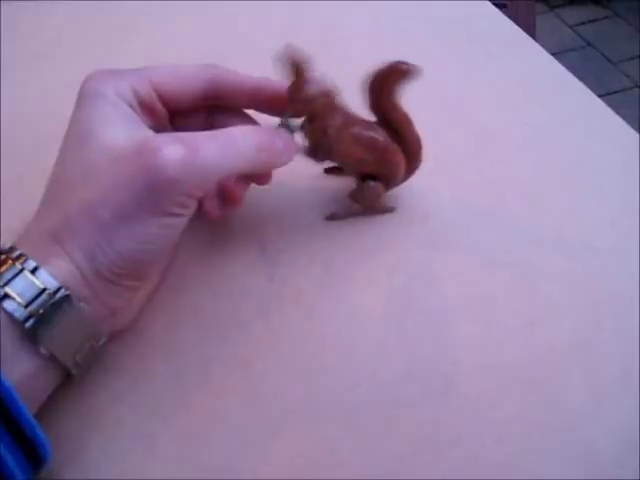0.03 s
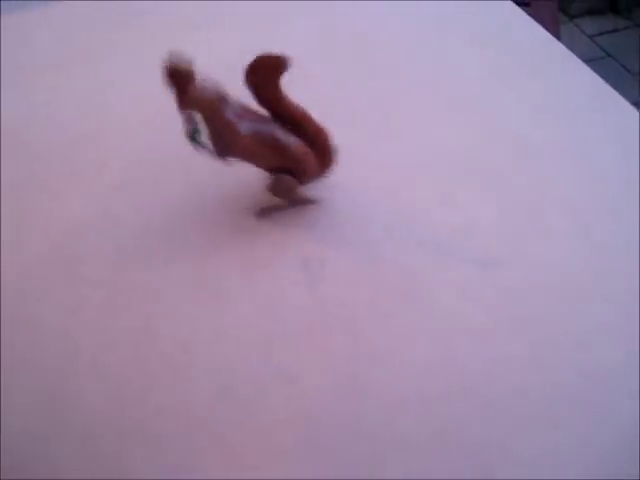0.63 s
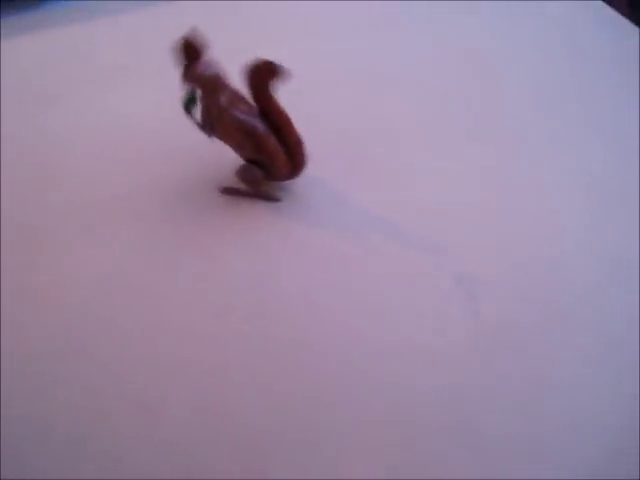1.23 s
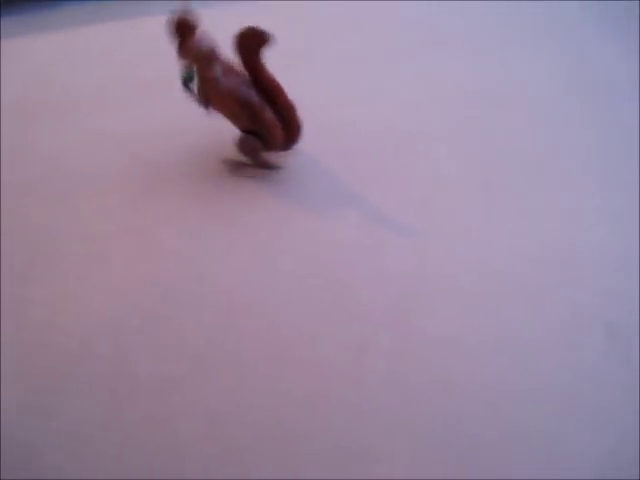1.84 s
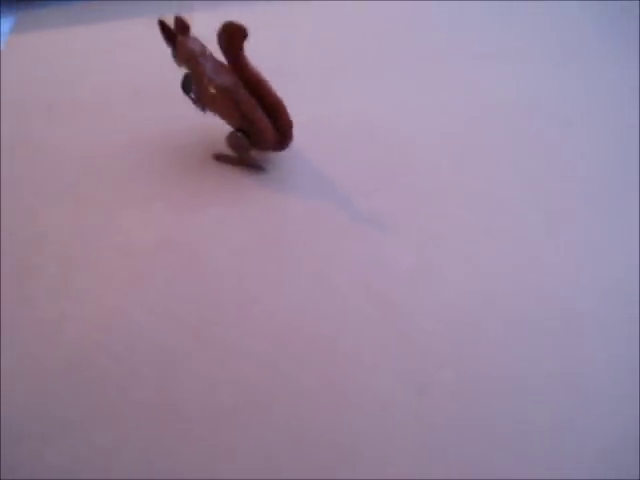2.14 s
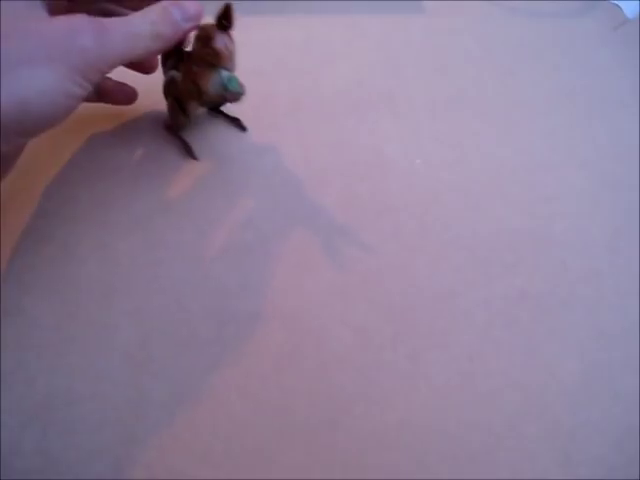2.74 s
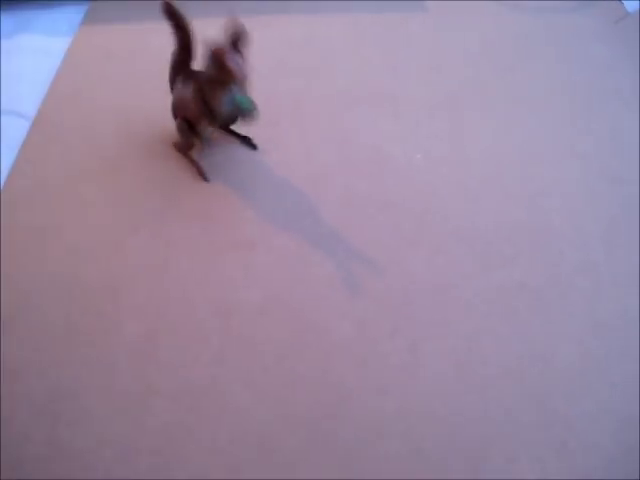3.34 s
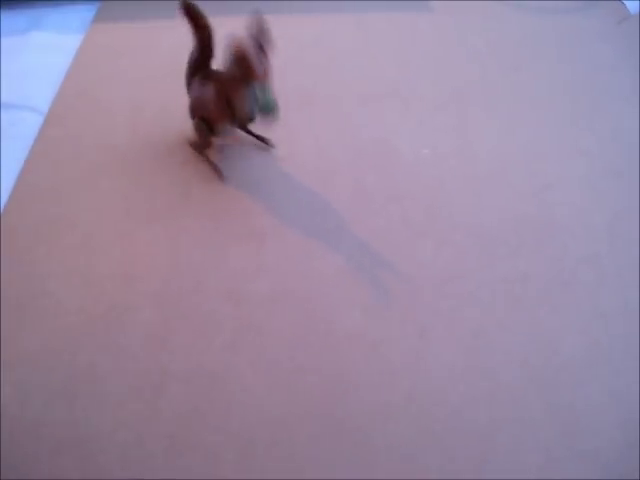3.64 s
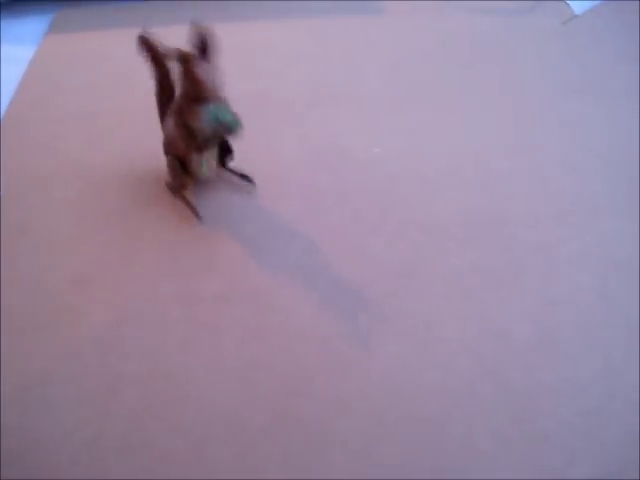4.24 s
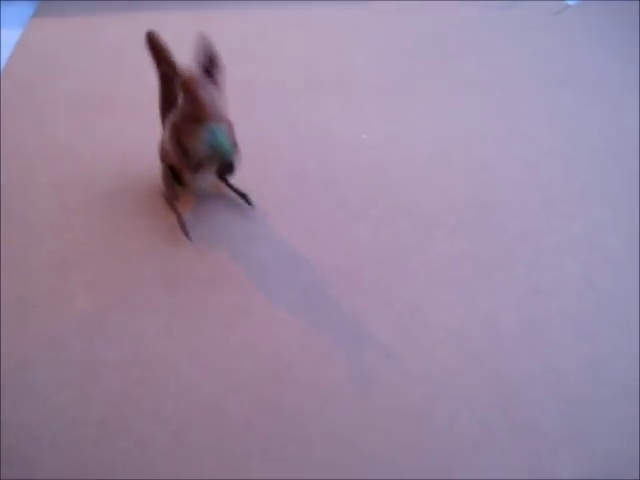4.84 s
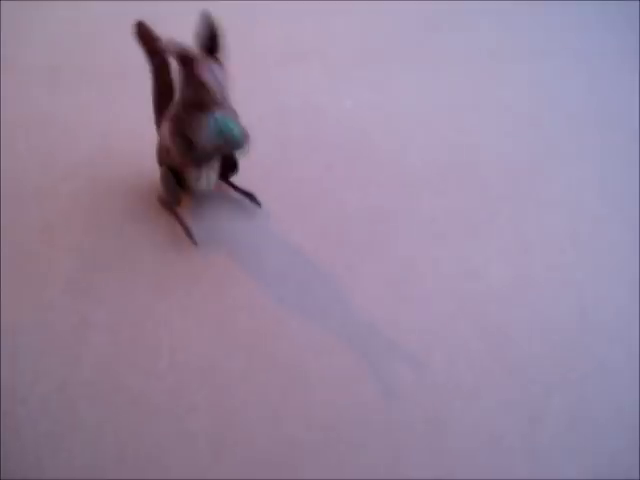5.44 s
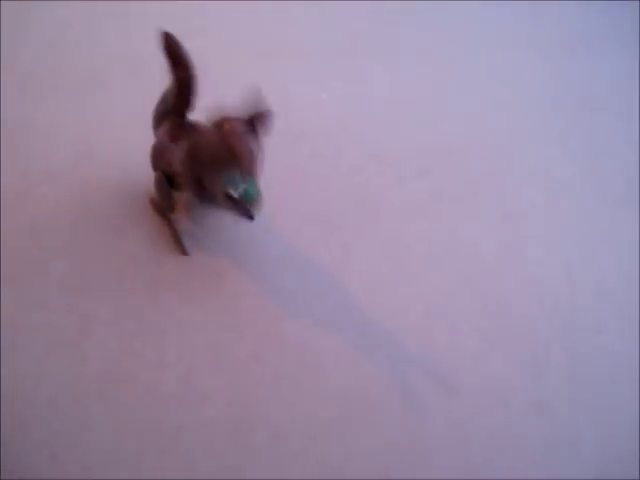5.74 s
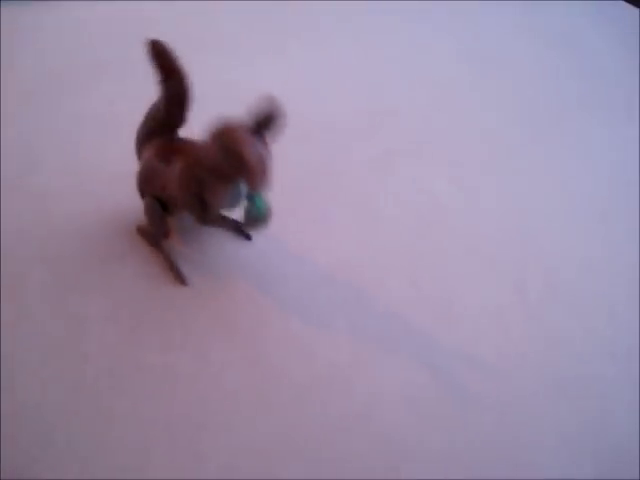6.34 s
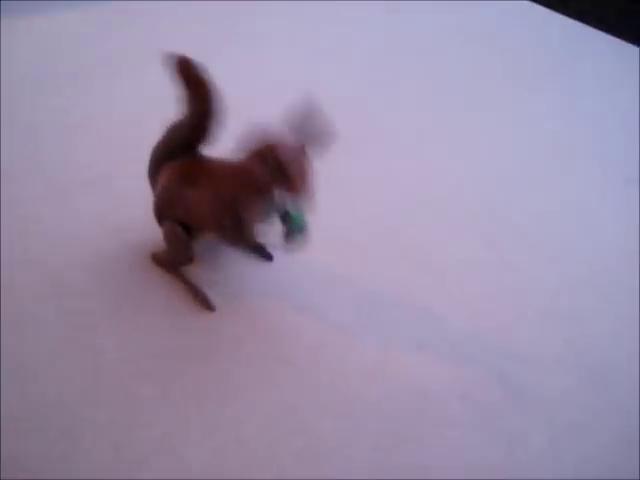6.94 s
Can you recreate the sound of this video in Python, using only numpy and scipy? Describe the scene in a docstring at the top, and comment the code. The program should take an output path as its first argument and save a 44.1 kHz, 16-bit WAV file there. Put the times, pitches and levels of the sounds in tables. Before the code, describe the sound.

A wind-up tin squirrel hops across a board close by, clacking and rattling five or six times a second over a faint gear whirr.

```python
"""Tin feet clack on a board: a clockwork squirrel hops close by, five to six times a second.
Each hop is one turn of a cam: the feet land, the toy rocks and rattles, the sprung legs kick out and
snap back. Every impact excites the modes of the tin; gears whirr and the board drums as the toy rocks.
It is heard first side-on, then, after a brief gap, head-on over a low hum, where the body also recoils
against its stop after the snap-back."""
import sys
import numpy as np
from scipy import signal
from scipy.fft import rfft, irfft
from scipy.io import wavfile
from scipy.ndimage import uniform_filter1d, map_coordinates

SR = 44100
rng = np.random.default_rng(int(sys.argv[2]) if len(sys.argv) > 2 else 0)


def persist_wave(psi):
    """Save psi, clipped to +-1, as 16-bit WAV."""
    counts = np.round(np.clip(psi, -1, 1) * 32767).astype(np.int16)
    wavfile.write(sys.argv[1], SR, np.atleast_2d(counts).T)


N = 308700

# turns of the cam: landing t/s, wait to kick t/s, wait to snap-back t/s, landing level/dB, kick level/dB
HOPS = [(0.042, .052, .057, -3, -3), (0.241, .037, .041, -5, -2.5), (0.408, .037, .045, -7.5, -4.5),
        (0.542, .057, .049, -5, -4), (0.703, .071, .046, -2, -2.5), (0.87, .066, .048, -5.5, -2.5),
        (1.036, .082, .04, -1.5, -2.5), (1.203, .082, .041, -5, -2.5), (1.375, .077, .045, -6.5, -3),
        (1.548, .075, .045, -4.5, -4), (1.718, .073, .052, -3, -4), (1.89, .069, .051, -3, -3),
        (2.061, .071, .05, -3.5, -3), (2.23, .076, .043, -4.5, -2), (2.396, .085, .042, -4, -3),
        (2.568, .08, .045, -7.5, -3), (2.782, .051, .05, -14, -3.5), (2.927, .044, .051, -4, -5.5),
        (3.123, .063, .044, -3.5, -1.5), (3.308, .085, .042, -7.5, -2), (3.53, .061, .045, -3, -2.5),
        (3.719, .059, .046, -5, -2.5), (3.912, .049, .053, -3.5, -4), (4.093, .062, .054, -5.5, -3),
        (4.294, .069, .051, -4.5, -5), (4.501, .071, .045, -6, -3), (4.7, .074, .043, -6, 0),
        (4.91, .067, .044, -4, -4), (5.111, .053, .05, -4, -3.5), (5.296, .056, .054, -4.5, -3.5),
        (5.495, .057, .053, -5, -1), (5.689, .052, .053, -3, -2.5), (5.872, .072, .044, -6.5, -2),
        (6.072, .077, .043, -3, -1.5), (6.283, .079, .044, -3.5, -3), (6.499, .057, .048, -2.5, -3),
        (6.686, .062, .055, -4, -3.5), (6.895, .054, .055, -3, -4)]
# spans in which the toy is heard, side-on and then head-on: start t/s, end t/s
SPANS = [(0.037, 2.604), (2.739, 7.1)]
# resonances of the tin shell: centre f/Hz, width f/Hz, level/dB
SHELL_MODES = [(695, 330, -1.5), (1120, 270, 0.5), (1780, 184, -4), (2545, 224, 3), (3020, 340, 2),
               (3810, 360, 1.5), (4630, 900, 3.5), (5110, 160, 2.5), (5920, 720, 7), (6760, 390, 5.5),
               (7630, 690, 8.5), (9100, 1050, 3), (9730, 280, -7), (10610, 600, 0.5), (11980, 4000, -0.5),
               (14000, 670, -3), (15250, 1740, -3)]
# directivity of the shell, side-on relative to head-on: f/Hz, level/dB
SHELL_SIDE_ON = [(300, -2.5), (700, -5.5), (1150, 0), (1800, -1), (2650, -1), (3400, -2), (4900, 1.5),
                 (5900, -2.5), (8400, 0), (10000, -3.5), (14000, 0.5)]
# spectrum of the gears' rubbing and of the faint noise floor: f/Hz, level/dB
RUB_COLOUR = [(100, -10), (400, 0), (1100, 1), (1600, 0), (2600, 0), (3500, -5), (5500, -9), (8000, -14),
              (12000, -18), (16000, -22)]
RECOIL_S = .034  # from snap-back until the body hits its stop


def amp(db):
    return 10 ** (np.asarray(db) / 20)


def unit_rms(x):
    return x / np.sqrt(np.mean(x ** 2) + 1e-20)


def unit_energy(x):
    return x / np.sqrt(np.sum(x ** 2, -1, keepdims=True) + 1e-20)


def along(points, hz):
    """Interpolation of (f/Hz, value) points on a logarithmic frequency axis."""
    f, values = np.transpose(points)
    return np.interp(np.log(hz + 1), np.log(f + 1), values)


def by_side(t, side_on, head_on):
    """The value for the way the toy faces at time t."""
    return np.where(t < SPANS[1][0], side_on, head_on)


def wobble(knot_hz):
    """Smooth random modulation: a spline through Gaussian knots."""
    knots = rng.standard_normal(int(N * knot_hz / SR) + 4)
    return map_coordinates(knots, [np.arange(N) * knot_hz / SR])


def noise(colour):
    """Spectrally shaped Gaussian noise of rms 1."""
    gain = amp(along(colour, np.fft.rfftfreq(N, 1 / SR)))
    return unit_rms(irfft(rfft(rng.standard_normal(N)) * gain, N))


def causal(x, gain_db):
    """Minimum-phase filtering of each row: the response follows its excitation."""
    cepstrum = irfft(np.log(amp(gain_db)))
    half = cepstrum.shape[-1] // 2
    cepstrum[..., 1:half] *= 2
    cepstrum[..., half + 1:] = 0
    return irfft(rfft(x) * np.exp(rfft(cepstrum)))


def cam(let_go_s=2.9):
    """Times of landing, kick, snap-back and recoil; recoils begin once a steadying hand lets go."""
    land, to_kick, to_back, *_ = np.transpose(HOPS)
    back = land + to_kick + to_back
    return land, land + to_kick, back, back[land > let_go_s] + RECOIL_S


def modes_db(modes, hz, count, vary_db=2.5):
    """Lorentzian resonances add in power; each contact point weights them differently."""
    centre, width, db = np.transpose(modes)
    shapes = 1 / (1 + (2 * (hz - centre[:, None]) / width[:, None]) ** 2)
    weights = amp(db + vary_db * rng.standard_normal((count, len(modes)))) ** 2
    return 10 * np.log10(weights @ shapes)


def tails(t, count, t60, treble_life=0.68, split_hz=6000):
    """Diffuse ringing of the whole toy; damping is stronger in the treble."""
    white = rng.standard_normal((count, len(t)))
    low = signal.sosfilt(signal.butter(2, split_hz, fs=SR, output="sos"), white)
    high = signal.sosfilt(signal.butter(2, split_hz, "high", fs=SR, output="sos"), white)
    return low * amp(-60 * t / t60) - high * amp(-60 * t / (t60 * treble_life))


def rings(t, count):
    """Free vibration of the spring and tin edges: damped sinusoids in a random mix."""
    # narrow modes: f/Hz, level/dB, 60 dB decay t/s
    edge_modes = [(1150, 5, .06), (1690, -2, .08), (2145, 10, .041), (2627, 6, .11), (2700, 9, .04),
                  (2980, 12, .05), (4400, 8, .05), (4700, 5, .07), (9550, 9, .035), (11995, -8, .1)]
    partials = np.array([amp(db - 60 * t / t60) * np.sin(2 * np.pi * f * t) for f, db, t60 in edge_modes])
    return unit_energy(rng.standard_normal((count, len(edge_modes))) @ partials)


def pings(t, count, low_hz=3500, high_hz=12000, t60=.04, per_blow=5):
    """Thin sheet has a high modal density; each blow briefly excites a few high modes."""
    hz = rng.uniform(low_hz, high_hz, (count, per_blow, 1))
    return unit_energy(np.sin(2 * np.pi * hz * t).sum(1) * amp(-60 * t / t60))


def blows(times, db, modes, colour, side_on, *, rise_s, hold_s, t60, spiky_db, lead_in_db,
          tail_db, tail_t60, tail_metal, ring_db, ping_db, vary_db,
          tint=((1000, 0),), heft=((1000, 0),), size=8192):
    """Impact excitation: a burst of contacts drives the resonances, leaving a tail and a thin ring."""
    count, lead = len(times), size // 32
    t, hz = (np.arange(size) - lead) / SR, np.fft.rfftfreq(size, 1 / SR)
    after = np.maximum(t, 0)
    attack = 1 - np.exp(-after / rise_s)
    # a faint, brief rush of noise leads into each click; the parts chatter for a moment and part
    lead_in = amp(lead_in_db) * np.exp(-np.abs(t) / .0007)
    chatter = attack * amp(-60 * np.maximum(t - hold_s, 0) / t60)
    force = (lead_in + chatter) * rng.standard_normal((count, size))
    force *= amp(spiky_db * rng.standard_normal((count, size)))
    # hard contacts feed all broad bands evenly, so the metal sets the colour
    uneven_db = 10 * np.log10(uniform_filter1d(np.abs(rfft(force)) ** 2, size=140))
    metal_db = modes_db(modes, hz, count)
    crack = unit_energy(causal(force, metal_db + along(colour, hz) - uneven_db))
    # spectrum of the diffuse tail, before its share of the metal's colour: f/Hz, level/dB
    tail_colour = [(60, 2), (300, -7), (1000, 0.5), (2400, 2.5), (3400, -6.5), (5000, -5.5), (7500, -6.5),
                   (8500, -6), (12000, -2), (16000, 0.5)]
    tail_gain_db = along(tail_colour, hz) + tail_metal * metal_db
    tail = unit_energy(causal(attack * tails(after, count, tail_t60), tail_gain_db))
    sounds = crack + amp(tail_db) * tail
    sounds += amp(ring_db) * rings(after, count) + amp(ping_db) * pings(after, count)
    # by chance a flat blow knocks and an edge sizzles
    tone_db = np.array([along([(900, knock), (2700, clack), (5600, 0), (11000, sizzle)], hz)
                        for knock, clack, sizzle in vary_db * rng.standard_normal((count, 3))])
    harder_db = np.reshape(db - np.mean(db), (-1, 1))
    tone_db += along(tint, hz) + harder_db * along(heft, hz)
    tone_db += by_side(times[:, None], along(side_on, hz), 0)
    sounds = np.reshape(amp(db), (-1, 1)) * unit_energy(causal(sounds, tone_db))
    samples = np.round(times * SR).astype(int)[:, None] + np.arange(size)
    return np.bincount(samples.ravel(), sounds.ravel(), N + lead)[lead:N + lead]


def feet(land_db=11):
    """Impact on the board excites the modes of the feet at each landing."""
    # resonances of the feet: centre f/Hz, width f/Hz, level/dB
    foot_modes = [(600, 170, 6.5), (1067, 273, 7), (2140, 680, 3), (2700, 155, 3), (2930, 240, 8),
                  (4300, 850, -7), (5780, 770, 0), (7400, 1300, 2.5), (9940, 790, 0.5), (10370, 160, -20),
                  (11920, 160, -6), (12300, 260, -4), (14000, 2800, -13)]
    # spectrum of a landing: f/Hz, level/dB
    landing_colour = [(30, -2), (120, 13), (300, 18), (600, 0), (3000, 7), (8000, 6), (16000, -6)]
    # directivity of the feet, side-on relative to head-on: f/Hz, level/dB
    feet_side_on = [(300, 0), (1000, -2.5), (2300, 2.5), (3000, -3), (4500, 8.5), (7000, -6.5),
                    (10000, -1.5), (14000, 7)]
    land, _, _, strength_db, _ = np.transpose(HOPS)
    return blows(land, land_db + strength_db, foot_modes, landing_colour, feet_side_on,
                 rise_s=.0004, hold_s=.001, t60=.026, spiky_db=0, lead_in_db=-18,
                 tail_db=-7, tail_t60=.11, tail_metal=.9, ring_db=-22.5, ping_db=-34, vary_db=1)


def rocking(attack_s=.002, sag_db_per_s=48, release_db_per_s=251, recoil_db=-.5, idle_db=-14):
    """Damped rocking, in dB relative to a fresh landing: it sags until the kick, then dies to idle."""
    land, kick, _, recoil = cam()
    t = np.arange(N) / SR
    spells = [(start, stop, 0) for start, stop in zip(land, kick)]
    spells += [(start, start + RECOIL_S, recoil_db) for start in recoil]
    motion = np.full(N, amp(idle_db))
    for start, stop, db in spells:
        part = slice(round(start * SR), round(start * SR) + SR // 2)
        age = np.maximum(t[part] - start, 0)
        fall_db = sag_db_per_s * age + release_db_per_s * np.maximum(t[part] - stop, 0)
        motion[part] = np.maximum(motion[part], (1 - np.exp(-age / attack_s)) * amp(db - fall_db))
    return 20 * np.log10(motion)


def gears(t, rock_db, tooth_hz=140, follow=.45, tin_share=.21):
    """Meshing teeth modulate friction noise in the shell; the whirr grows as the toy rocks."""
    teeth_passed = np.cumsum(tooth_hz * amp(2 * wobble(40))) / SR
    tooth_strength = amp(rng.uniform(-6, 5, N))[teeth_passed.astype(int)]
    ticks = np.exp(-4 * (teeth_passed % 1)) * tooth_strength
    rub = (.55 + ticks) * noise(RUB_COLOUR)
    shell_db = modes_db(SHELL_MODES, np.fft.rfftfreq(N, 1 / SR), count=1)[0]
    whirr = unit_rms(causal(rub, tin_share * shell_db))
    return amp(by_side(t, -34.5, -35.5) + follow * rock_db) * whirr


def board(t, rock_db):
    """Forced vibration: the board drums in proportion to the rocking."""
    # response of the board: f/Hz, level/dB
    board_colour = [(20, -16), (55, -33), (90, -9), (135, 4), (175, -0.5), (230, 3), (315, 0.5),
                    (390, -13.5), (700, -9), (2000, -56)]
    return amp(by_side(t, -35, -33.5) + rock_db) * noise(board_colour)


def air(t):
    """Ambient noise with its power mostly at low frequencies."""
    # spectrum of the ambience: f/Hz, level/dB
    air_colour = [(20, -7), (40, 2), (55, 23), (75, -17), (120, 26), (250, -13), (600, -8.5), (1500, -21),
                  (5000, -36), (16000, -52)]
    return amp(by_side(t, -49.5, -46.5)) * noise(air_colour)


def loose_shell(shell_db=8.5, bounce_s=.015, scatter_db=3.5, rattles_per_hop=3):
    """Contact chatter: the loose shell bounces, rattles (side-on only), clatters and recoils."""
    # the toy tips and its shell clatters: t/s, relative level/dB
    stumbles = [(0.182, -10.5), (0.366, -3.5), (0.427, -4), (0.584, -11), (0.753, -1), (1.564, -4.5),
                (1.938, -24), (2.415, -2.5), (2.443, -4), (2.96, -6), (3.325, -4), (5.309, -5.5),
                (5.919, -18)]
    stumble, stumble_db = np.transpose(stumbles)
    land, kick, _, recoil = cam()
    bounce = land + bounce_s * np.exp(.25 * rng.standard_normal(len(land)))
    # rattles fall at random between bounce and kick
    rattle = bounce[:, None] + (kick - bounce)[:, None] * rng.random((len(land), rattles_per_hop))
    rattle = rattle[land < SPANS[1][0]].ravel()
    bounce_db = -12.5 + scatter_db * rng.standard_normal(len(bounce))
    rattle_db = -14 + scatter_db * rng.standard_normal(len(rattle))
    times = np.concatenate([bounce, rattle, stumble])
    db = np.concatenate([bounce_db, rattle_db, stumble_db])
    # spectrum of the chatter: f/Hz, level/dB
    clatter_colour = [(30, -30), (120, 8.5), (300, 10.5), (700, 5.5), (1500, 2), (3000, 4), (5000, -4),
                      (8000, -10), (12000, -0.5), (16000, -9.5)]
    # added colour of the body hitting its stop: f/Hz, level/dB
    recoil_tint = [(300, -2.6), (1000, -1.3), (1700, -2), (2700, 3.3), (4000, 2.4), (6000, 0.35),
                   (9000, -2.4), (14000, -2.7)]
    tin = SHELL_MODES, clatter_colour, SHELL_SIDE_ON
    contact = dict(rise_s=.0005, hold_s=.0015, lead_in_db=-17, tail_t60=.1)
    clatter = blows(times, shell_db + db, *tin, **contact, t60=.041, spiky_db=4.5,
                    tail_db=-4.5, tail_metal=.31, ring_db=-10, ping_db=-16.5, vary_db=3.5)
    recoils = blows(recoil, shell_db - 4.5, *tin, **contact, t60=.027, spiky_db=0, tint=recoil_tint,
                    tail_db=-5, tail_metal=.41, ring_db=-17, ping_db=-13, vary_db=-.5)
    return clatter + recoils


def legs(kick_db=15.5, back_db=10.1):
    """Brief, hard impacts of the sprung lever ring the shell: a kick out, then a lighter snap back."""
    # spectrum of the lever's impact: f/Hz, level/dB
    snap_colour = [(30, -2), (120, 7.5), (300, 2.5), (700, 3), (1500, 3.5), (3500, 1.5), (8000, -3.5),
                   (12000, 0), (16000, -5.5)]
    # a harder kick has more body: f/Hz, gain/(dB per dB of strength)
    kick_heft = [(900, 0.94), (2700, 0.5)]
    # added colour of the snap-back: f/Hz, level/dB
    back_tint = [(200, 2), (580, 4), (880, -5), (1150, -1), (3000, 0), (4500, 2), (8000, 1), (14000, 3.5)]
    _, kick, back, _ = cam()
    *_, strength_db = np.transpose(HOPS)
    tin = SHELL_MODES, snap_colour, SHELL_SIDE_ON
    contact = dict(rise_s=.0004, hold_s=.0016, lead_in_db=-19, tail_t60=.1, tail_metal=1)
    kicks = blows(kick, kick_db + strength_db, *tin, **contact, t60=.01, spiky_db=2,
                  tail_db=-9.5, ring_db=-14, ping_db=-11.5, vary_db=1.53, heft=kick_heft)
    snaps = blows(back, back_db, *tin, **contact, t60=.011, spiky_db=2.5,
                  tail_db=-7.5, ring_db=-11, ping_db=-12, vary_db=2.03, tint=back_tint)
    return kicks + snaps


def hum(t, hum_hz=118.6, trim_db=-4):
    """Harmonics of a slightly wavering fundamental swell and fade while the toy is head-on."""
    # envelope of the hum: t/s, relative level/dB
    swells = [(2.76, -28.5), (2.98, -42), (3.15, -32.5), (3.38, -54), (3.73, -39), (3.85, -41.5),
              (4.68, -33), (5.56, -39.5), (5.74, -67), (5.94, -38.5), (6.74, -33), (7.0, -35)]
    # partials of the hum: harmonic number, level/dB
    harmonics = [(1, 3), (2, -8.5), (3, -27), (5, -9.5)]
    swell_db = np.interp(t, *np.transpose(swells))
    phase = 2 * np.pi * np.cumsum(hum_hz * (1 + .0031 * wobble(5))) / SR
    tone = unit_rms(sum(amp(db) * np.sin(k * phase) for k, db in harmonics))
    return by_side(t, 0, amp(swell_db + trim_db) * tone)


def scene():
    """Superposition of all sources in one channel."""
    t, rock_db = np.arange(N) / SR, rocking()
    impacts = legs() + feet() + loose_shell()
    return (impacts + gears(t, rock_db) + board(t, rock_db) + hum(t) + air(t))[None]


def record(dry, ceiling=2.2, top_hz=15800):
    """Gating to a faint noise floor outside the two spans, soft saturation of peaks, and a low-pass."""
    t = np.arange(N) / SR
    gate = uniform_filter1d(sum((t > start) * (t < end) * 1. for start, end in SPANS), size=64)
    x = gate * dry + amp(-78) * noise(RUB_COLOUR)
    x = x / (1 + (x / ceiling) ** 4) ** (1 / 4)
    return signal.sosfilt(signal.ellip(10, .1, 70, top_hz, fs=SR, output="sos"), x)


dry = scene()
out = record(dry)
persist_wave(out)
```